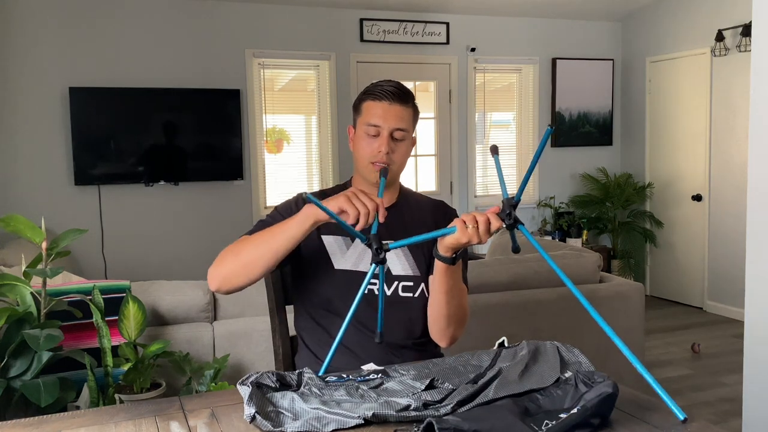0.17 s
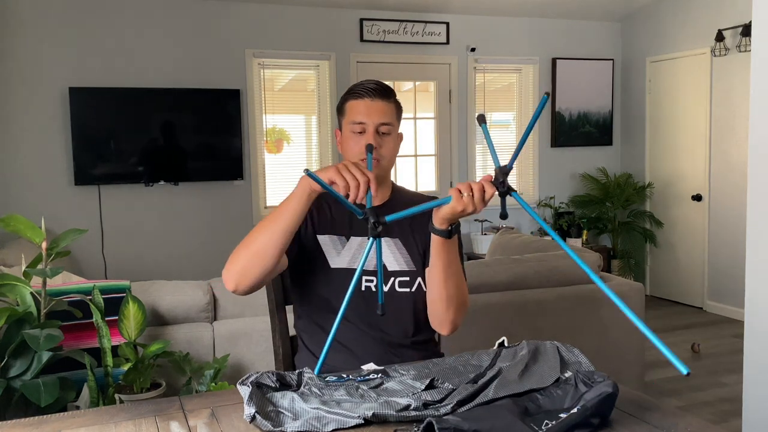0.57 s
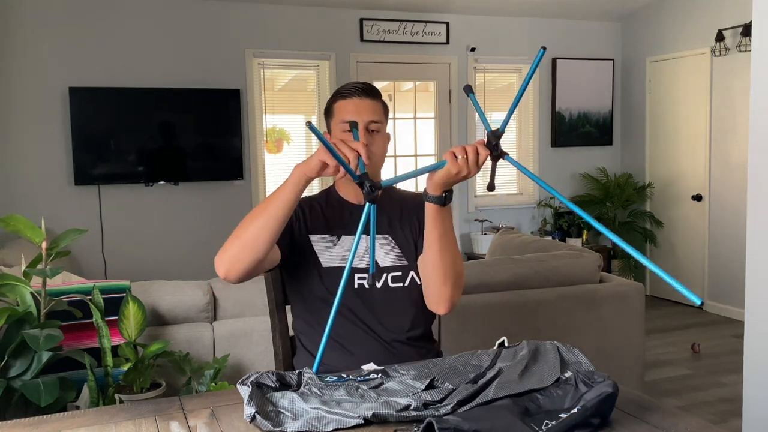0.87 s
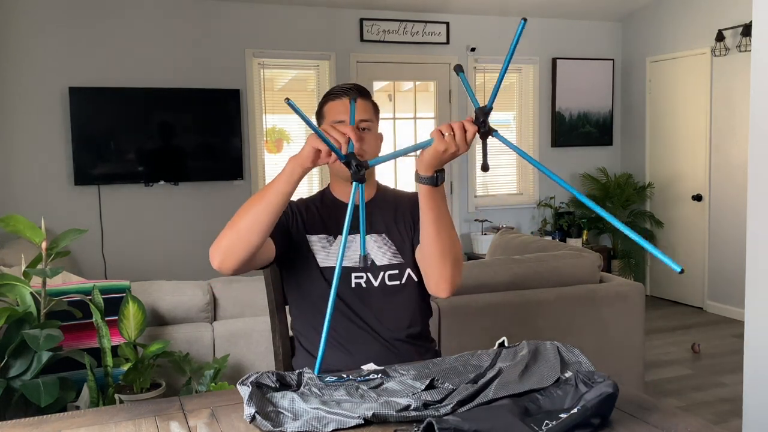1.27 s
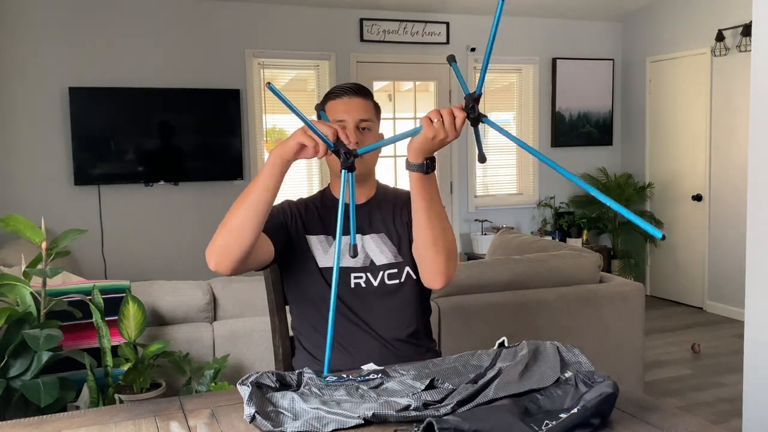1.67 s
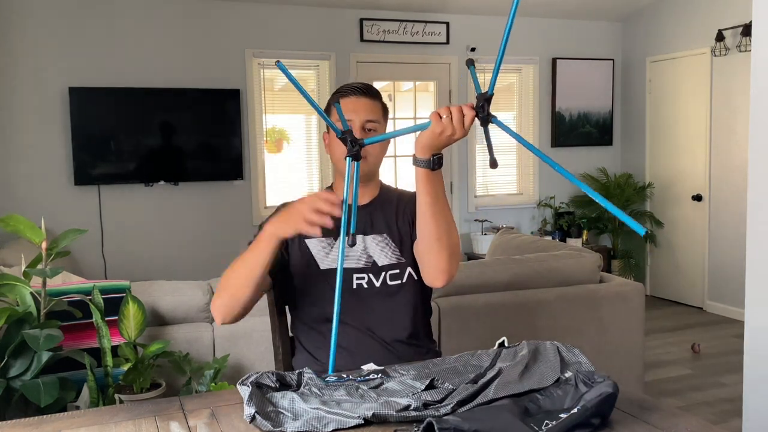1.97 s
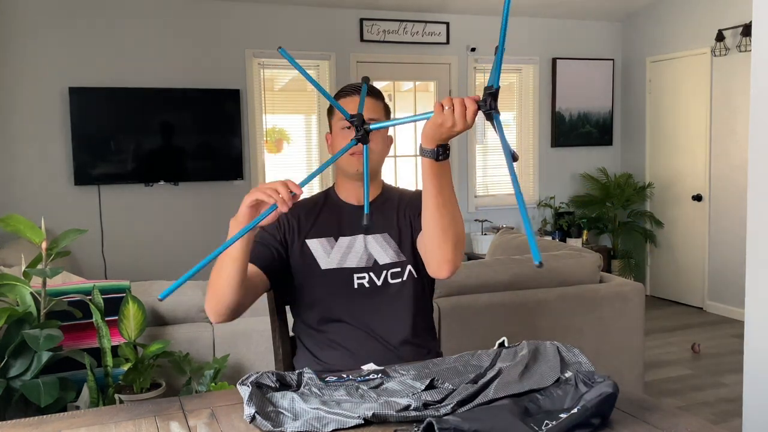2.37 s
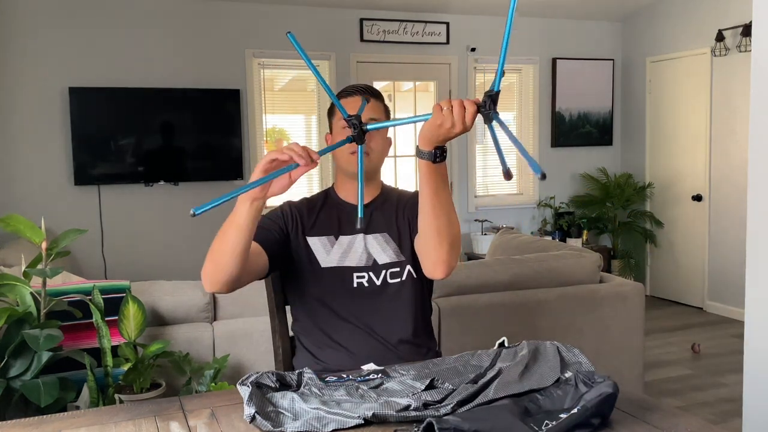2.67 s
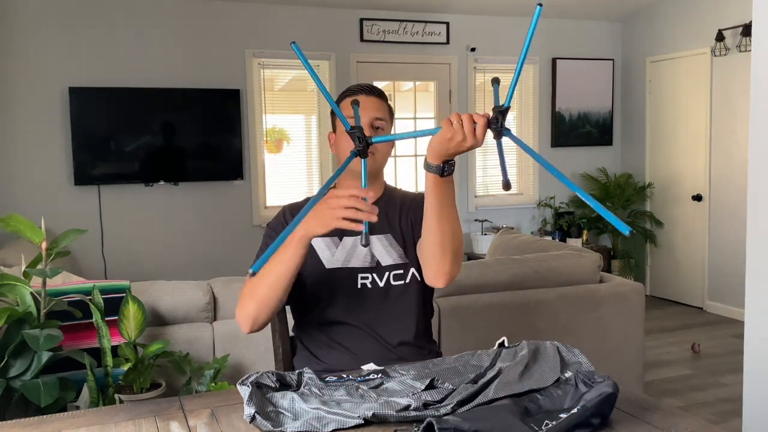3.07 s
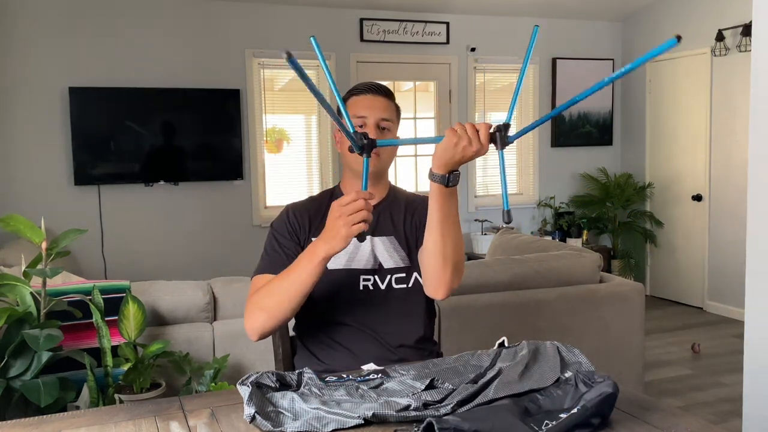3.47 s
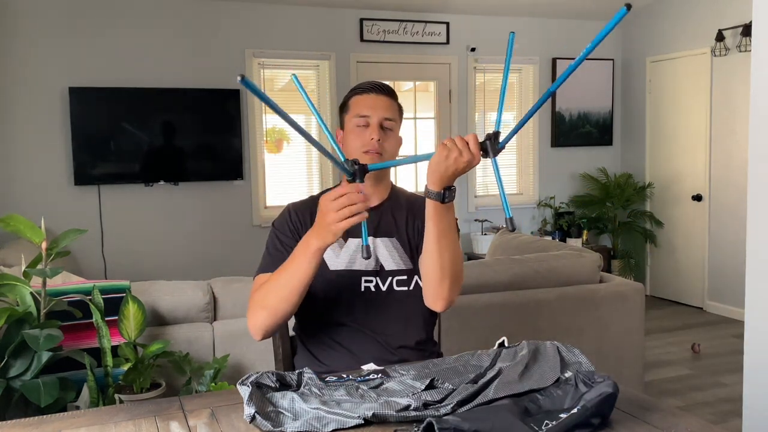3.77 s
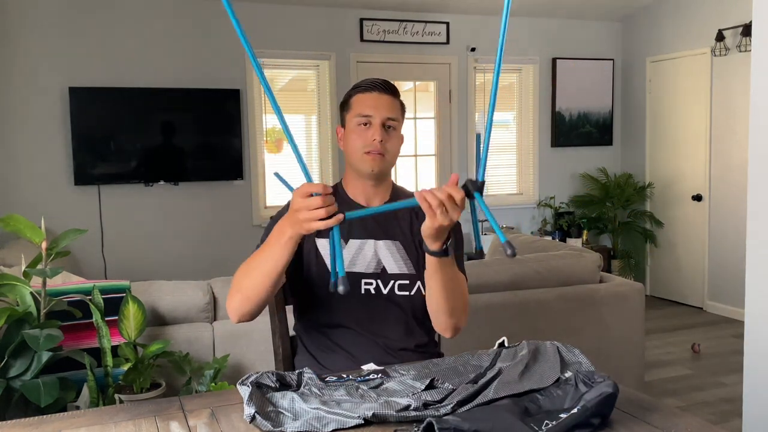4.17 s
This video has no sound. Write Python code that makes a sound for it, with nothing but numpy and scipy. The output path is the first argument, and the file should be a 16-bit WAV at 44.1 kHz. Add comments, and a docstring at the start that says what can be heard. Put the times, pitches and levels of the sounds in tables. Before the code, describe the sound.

Hollow aluminium poles clack into their sockets at uneven intervals, with soft scuffing and tiny rattles over a quiet household hum.

```python
"""Sliding metal poles together

Aluminium pole sections slide home into their sockets, two metres from a phone in a furnished living room.
Joints chatter faster and faster as they slide, and tubes knock: a short ragged contact sets tube modes ringing.
Fingers scuff the tubes in dense tiny slips, and a pole foot bumps the wooden table, which answers with low modes.
Echoes and a fading noise tail make the room, over a low household hum of shaped noise and a wavering tone."""
import sys
import numpy as np
from scipy import signal
from scipy.fft import rfft, irfft, next_fast_len
from scipy.io import wavfile
from scipy.ndimage import uniform_filter1d

SR = 44100
rng = np.random.default_rng(int(sys.argv[2]) if len(sys.argv) > 2 else 0)


def log_audio(samples):
    """Write samples as a 16-bit WAV file to the path given in sys.argv[1]."""
    # one column per channel
    frames = np.atleast_2d(samples).T
    # limit to full scale, then quantise
    limited = np.clip(frames, -1, 1)
    pcm = np.round(limited * 32767).astype(np.int16)
    wavfile.write(sys.argv[1], SR, pcm)


N = 189977

# Knocks of tube on tube: start_s, level_db, contact_ms, body_tilt_db_per_octave (below the knee),
# treble_tilt_db_per_octave (above the knee), favoured_mode_hz, favoured_mode_boost_db
TUBE_KNOCKS = [(.075, -14, 3.44, 7.5, -1, 1627, 18), (0.802, -46, 6.5, -5.5, -6.5, 3050, 24),
               (0.871, -56.5, 2.5, 16, -8, 2480, 10), (0.923, -54, 2.5, 7, 1, 2960, 7),
               (0.967, -51.5, 1.6, 4, -1, 4400, 19), (.988, -47, 4.2, -10, -7.5, 3050, 19),
               (1.444, -48, 7, -16.5, -10, 2980, 15.5), (1.589, -28.5, 4.1, -26, -4, 3400, 20),
               (1.595, -26.5, 3.5, -14.5, -6.5, 3400, -2.5), (1.606, -6, 2.9, -7.5, 2.5, 8130, 14),
               (2.007, -52.5, 2.8, 8.5, 3, 2485, 3), (2.021, -53.5, 2, -23, -19.5, 3020, 5.5),
               (2.030, -31, 3.67, -10, -1, 6410, 6), (2.037, -37.5, 1, 1, -3.5, 6500, 38),
               (2.049, -51.5, 3, -10, -16, 3030, 5), (2.0799, -35.5, 1.1, -4, -6, 2970, 0),
               (2.567, -31.5, 0.86, -23, -1, 4380, 12), (2.598, -40, 2.2, -27, -6, 4360, 21),
               (2.626, -40.5, 1.5, -31, -16, 4300, 10), (2.649, -9.5, 2.68, -4.5, 3, 9650, 13),
               (2.935, -31.5, 5.2, -10.5, -1, 12610, 36), (3.084, -56, 2.4, -24, 1.5, 4400, 14.5),
               (3.109, -57, 2.2, -12, 2.5, 6300, 1), (3.155, -58.5, 1.6, -15, 0, 9800, -10),
               (3.179, -54.5, 3, -11, 4, 7900, 18), (3.214, -54.5, 2.2, -31.5, 3, 7550, 11),
               (3.254, -49.5, 2, -2.5, -5, 4350, 17), (3.337, -58.5, 2.2, -10, -1, 7960, 16),
               (3.396, -58.5, 1.24, -8.5, 2, 9600, 14), (3.418, -58, 2.2, -16.5, -9.5, 6350, 4),
               (3.575, -19.5, 1.96, -7.5, -5, 3050, 16), (3.827, -51.5, 5.8, -0.5, -12, 2880, 12),
               (3.940, -46, 2.9, -14.5, -11, 4330, 1), (3.949, -51, 1.6, -12.5, -5, 5500, 6),
               (4.034, -51, 1.3, -14, -4.5, 6400, 21), (4.102, -53, 3, -14, 7, 6400, 9),
               (4.114, -48.5, 2.8, -16, -5, 3400, -1), (4.129, -61, 3.3, -9, -12, 2460, 6),
               (4.139, -42, 1.7, -20, -1, 4500, 20), (4.157, -40, 8, -13.5, -3, 5500, 14),
               (4.173, -49, 1.5, 0, 5, 5500, 3)]
# Ringing modes of a tube: pitch_hz, relative_level_db, free_t60_s (time to fade by 60 dB)
TUBE_MODES = [(365, 4, .05), (1150, 0, .02), (1660, 0, .02), (2480, 0, .02), (3050, 0, .012),
              (3400, 0, .02), (4330, 0, .02), (5500, 0, .02), (6400, 0, .025), (6800, 0, .02),
              (7640, -7, .04), (7850, -4, .05), (8060, -4, .05), (8700, 0, .02), (9650, 0, .025),
              (12750, -2, .05)]
# Modes of the whole frame, thumping under a knock: pitch_hz, level_re_knock_db, t60_s
FRAME_MODES = [(140, -43, 0.14), (360, -37.5, 0.2)]
# Chatter of a sliding joint: start_s, length_s, first_rate_hz, last_rate_hz,
# speed_up_power (of the way slid), final_level_db, first_overtone_level_db
JOINT_SLIDES = [(1.547, 0.046, 1090, 8450, 1.5, -43, -5), (2.535, 0.026, 2700, 13100, 0.93, -26.5, -1),
                (3.455, 0.054, 1009, 9080, 1.5, -46.5, 0)]
# Scuffing strokes, after a first row that stands in for the room's tail fading from an earlier bump: loudest_s,
# level_db, rise_s, fall_s (each time covers 20 dB)
SCUFF_STROKES = [(0.001, -40.5, 0.045, 0.16), (0.399, -62, 0.82, 0.017), (1, -67.5, 1, 1.9),
                 (1.5, -64.5, .9, .1), (1.6, -43.5, 0.056, .015), (2.032, -66, 0.11, 0.31),
                 (2.562, -51, 0.052, 0.33), (3.25, -68, 0.49, .04), (3.519, -52.5, 0.085, 0.18),
                 (3.959, -61, 0.12, 0.081), (4.163, -55.5, 0.18, 0.12)]
# Tone of the scuffing: pitch_hz, relative_level_db
SCUFF_TONE = [(300, -41.5), (1000, 0.5), (2500, 0), (5000, -4.5), (9000, -5.5), (13000, -10.5),
              (16000, 0.5)]
# Bumps on the table top, the first already fading at the start: start_s, level_db (before mode or rap levels)
TABLE_BUMPS = [(-.03, -29.5), (0.074, -28), (0.384, -58)]
# Tone of the rap on the wood: pitch_hz, relative_level_db
RAP_TONE = [(300, 10.5), (700, 15), (900, 13), (1150, 25), (1400, 3), (1700, 2), (2300, -1), (4000, -8.5),
            (9000, -8), (14000, -21)]
# Ringing modes of the table top: pitch_hz, relative_level_db, t60_s
TABLE_MODES = [(73.44, -9.5, 0.76), (199, -32.5, 0.11), (216.7, -9, 0.63), (240, -19.5, .15),
               (257, 1.5, 0.28), (305.6, -12, 0.37), (343, -10.5, 0.51), (370.4, -9, 0.87),
               (508, -22, 0.017), (739, -14, 0.15)]
# Fading time of the room: pitch_hz, t60_s
ROOM_FADE = [(250, 1), (700, 0.65), (1500, 0.45), (3000, 0.47), (6000, 0.43), (9000, 0.39), (14000, 0.17)]
# Echoes off table, ceiling and wall: delay_s, level_db
ROOM_ECHOES = [(.003, -13), (.0105, -12), (.022, -20)]
# Tone of the household noise: pitch_hz, relative_level_db_per_hz
HUM_TONE = [(13, -11.5), (21, 4), (27, -11.5), (40, -13), (62, -0.5), (115, -21.5), (217, -10), (278, -11),
            (457, -16.5), (496, -22), (750, -27), (2390, -45), (6500, -46.5), (8200, -42), (10000, -42.5),
            (16000, -62)]
# Treble colour of the microphone port: pitch_hz, gain_db
MIC_TONE = [(5000, 0), (8000, 1), (10000, 1), (11400, -8), (12800, -5), (13800, -9), (16000, -21)]

# Knocks: the two tilts meet at the knee and reach out to the body and treble pitches
KNEE_HZ, BODY_HZ, TREBLE_HZ = 2800, 1360, 9260
BASS_DB = -22  # at 600 Hz: thin tubes hardly move bass
TOP_DROP_DB = -3.5  # at 13 kHz, below the treble
RING_DB, RING_SCATTER_DB = -32, 2
CONTACT_RISE_MS = 0.82
# Slides
SWELL_DB = 31  # gain over the slide
HOME = .85  # share of the slide after which the rate climbs no more
OVERTONE_FADE_DB = 15.5
GRIP = 0.16  # share of the ringing time left where a hand holds the tube
# Scuffs and raps
SLIPS_PER_S, SLIP_SCATTER_DB = 450, 2.2
RAP_DB, RAP_MS = 8.5, 15.7
# Room and background
ROOM_DB = -7  # whole tail, against the direct sound
ROOM_GAP_S = 0.00043  # build-up time of the tail
HUM_DB, MAINS_DB, MAINS_HZ = -53, -64, 58.4
# Microphone
CEILING = .75  # amplitude towards which peaks are rounded
TOP_HZ = 16300


def undb(db):
    """Turn decibels into a plain multiplier."""
    return 10 ** (np.asarray(db) / 20)


def unit(x):
    """Scale to an average (RMS) strength of one."""
    return x / np.sqrt(np.mean(x ** 2))


def colour(x, points):
    """Shape the tone by (pitch_hz, level_db) points, joined on a log-frequency axis."""
    hz, db = np.transpose(points)
    size = next_fast_len(len(x))
    bins = np.maximum(np.arange(size // 2 + 1) * SR / size, 1)
    gain = undb(np.interp(np.log(bins), np.log(hz), db))
    return irfft(rfft(x, size) * gain, size)[:len(x)]


def add(out, x, s):
    """Mix x in from time s on, dropping whatever lies outside the scene."""
    i = int(s * SR)
    part = x[max(-i, 0):N - i]
    out[max(i, 0):max(i, 0) + len(part)] += part


def ring(modes, size, scatter_db):
    """Decaying modes of one blow; where it lands decides how much each one sounds."""
    hz, db, t60 = np.transpose(modes)[:, :, None]
    t = np.arange(size) / SR
    level_chance, pitch_chance = rng.standard_normal((2, len(modes), 1))
    level = undb(db + scatter_db * level_chance - 60 * t / t60)
    pitch = hz * (1 + 0.0054 * pitch_chance)
    return (level * np.sin(2 * np.pi * pitch * t)).sum(0)


def crack(size, ms):
    """A ragged contact a few ms long; its spectrum is evened out, as for any hard, fast blow."""
    t_ms = 1000 * np.arange(size) / SR
    burst = rfft(rng.standard_normal(size) * np.exp(-(t_ms / ms) ** 3))
    # divide by the spectrum's own average over about 400 Hz
    even = irfft(burst / uniform_filter1d(np.abs(burst), size=int(400 * size / SR)), size)
    even[size // 2:] = 0
    even = even * (1 - np.exp(-t_ms / CONTACT_RISE_MS))
    return even / np.abs(even).max()


def knocks():
    """A short ragged contact cracks and sets the tube ringing."""
    out, size, lead = np.zeros(N), 4096, 64
    for s, db, ms, body, treble, mode_hz, boost_db in TUBE_KNOCKS:
        contact = crack(size, ms)
        modes = np.array(TUBE_MODES, float)
        modes[:, 1] += boost_db * np.exp(-(np.log(modes[:, 0] / mode_hz) / .04) ** 2)
        blow = contact + undb(RING_DB) * ring(modes, size, RING_SCATTER_DB)
        body_db = body * np.log2(KNEE_HZ / BODY_HZ)
        treble_db = treble * np.log2(TREBLE_HZ / KNEE_HZ)
        bands = [(600, BASS_DB), (BODY_HZ, body_db), (KNEE_HZ, 0),
                 (TREBLE_HZ, treble_db), (13000, treble_db + TOP_DROP_DB)]
        # band levels become levels per Hz
        shape = [(120, BASS_DB - 5.0)] + [(hz, db_band - 10 * np.log10(hz / 5000)) for hz, db_band in bands]
        # a short lead keeps the filter's skirt in front of the blow
        blow = colour(np.roll(blow, lead), shape)
        # the level is as if all the energy fell within 2 ms
        strength = np.sqrt(np.sum(blow ** 2) / (SR * .002))
        add(out, undb(db) * blow / strength, s - lead / SR)
    return out


def held(scatter_db):
    """The tube's answer to a tick while fingers damp it."""
    damped = np.array(TUBE_MODES) * [1, 1, GRIP]
    answer = ring(damped, size=1024, scatter_db=scatter_db)
    answer[0] = 0.83  # the tick itself
    return answer / np.sqrt(np.sum(answer ** 2))


def slides():
    """The loose end rattles faster as the play shrinks: a rising chirp that flares at each tube mode."""
    out = np.zeros(N)
    for s, length, first_hz, last_hz, speed_up, db, over_db in JOINT_SLIDES:
        way = np.linspace(0, 1, int(length * SR))
        smooth = uniform_filter1d(rng.standard_normal((2, 4096)), size=90)
        rate_wobble, level_wobble = smooth[:, :len(way)] * np.sqrt(90)
        hz = first_hz * (last_hz / first_hz) ** np.minimum(way / HOME, 1) ** speed_up
        phase = 2 * np.pi * np.cumsum(hz * (1 + .07 * rate_wobble)) / SR
        overtones = np.sin(2 * phase) + .7 * np.sin(3 * phase)
        overtones *= undb(over_db - OVERTONE_FADE_DB * way ** 3)
        overtones *= hz < SR / 7  # silent once they would reach too high
        catching_db = 5.5 * level_wobble
        level = undb(db - SWELL_DB * (1 - way) ** 2 + catching_db)
        fade = signal.windows.tukey(len(way), .2)
        add(out, fade * level * (np.sin(phase) + overtones), s)
    return signal.fftconvolve(out, held(scatter_db=2))[:N]


def scuffs():
    """Dense tiny slips of skin and cord on metal, a few stronger; four spots, each with its own tone. The first
    row stands in for the room's tail, still fading from an earlier bump."""
    out = 0
    for _ in range(4):
        slips = (rng.random(N) < SLIPS_PER_S / SR) * undb(SLIP_SCATTER_DB * rng.exponential(size=N))
        # each slip becomes a brief fading puff of noise
        smear = signal.lfilter([1], [1, -.9], slips) * rng.standard_normal(N)
        out = out + signal.fftconvolve(smear, held(scatter_db=6))[:N]
    t = np.arange(N) / SR
    strokes = [undb(db - 20 * np.maximum((s - t) / rise, (t - s) / fall))
               for s, db, rise, fall in SCUFF_STROKES]
    return unit(colour(out, SCUFF_TONE)) * np.max(strokes, axis=0)


def raps():
    """A pole foot raps the wooden top: a longer ragged contact with a woody tone."""
    out, lead = np.zeros(N), 512
    for s, db in TABLE_BUMPS:
        rap = colour(np.roll(crack(4096, RAP_MS), lead), RAP_TONE)
        add(out, undb(db + RAP_DB) * rap, s - lead / SR)
    return out


def thuds():
    """The top answers with low, dull modes that reach the phone through the wood."""
    out = np.zeros(N)
    for s, db in TABLE_BUMPS:
        add(out, undb(db) * ring(TABLE_MODES, size=22050, scatter_db=1.5), s)
    return out


def thumps():
    """Every knock also shakes the frame as a whole; so low and brief that the room adds little."""
    out = np.zeros(N)
    for s, db, *_ in TUBE_KNOCKS:
        add(out, undb(db) * ring(FRAME_MODES, size=4096, scatter_db=1.5), s)
    return out


def room():
    """Direct sound, three mirror echoes, and a diffuse tail that builds up and fades band by band."""
    size = 32768
    t, tail = np.arange(size) / SR, 0
    hz, t60 = np.transpose(ROOM_FADE)
    for centre in 125 * 2 ** np.arange(0, 7.1, .5):
        band_shape = [(centre / 1.414, -40), (centre / 1.3, -6), (centre, 0),
                      (centre * 1.3, -6), (centre * 1.414, -40)]
        band = colour(rng.standard_normal(size), band_shape)
        tail = tail + band * undb(-60 * t / np.interp(np.log(centre), np.log(hz), t60))
    tail = tail * (1 - np.exp(-(t / ROOM_GAP_S) ** 2))
    response = undb(ROOM_DB) * tail / np.sqrt(np.sum(tail ** 2))
    response[0] = 1  # direct sound
    for late, db in ROOM_ECHOES:
        response[int(late * SR)] += undb(db)
    return response


def hum():
    """Air handling and a wavering mains hum behind the walls, swelling a little, with the recorder's hiss."""
    swell = unit(uniform_filter1d(rng.standard_normal(N), size=8000))
    waver = unit(uniform_filter1d(rng.standard_normal(N), size=3000))
    mains_hz = MAINS_HZ + 1.6 * waver[::-1]
    mains = undb(MAINS_DB + 0.86 * waver) * np.sin(2 * np.pi * np.cumsum(mains_hz) / SR)
    noise = unit(colour(rng.standard_normal(N), HUM_TONE))
    return noise * undb(HUM_DB + 0.2 * swell) + mains


def scene():
    """Sounds in the air pass through the room; thuds and thumps arrive without it."""
    close = knocks() + slides() + scuffs() + raps()
    return (signal.fftconvolve(close, room())[:N] + thuds() + thumps())[None]


def record(dry):
    """The microphone port colours the treble, the steady background joins, peaks are rounded, the top is cut."""
    mixed = colour(dry[0], MIC_TONE) + hum()
    rounded = CEILING * np.tanh(mixed / CEILING)
    top_cut = signal.ellip(8, .2, 70, TOP_HZ, fs=SR, output="sos")
    return signal.sosfilt(top_cut, rounded)[None]


dry = scene()
out = record(dry)
log_audio(out)
```